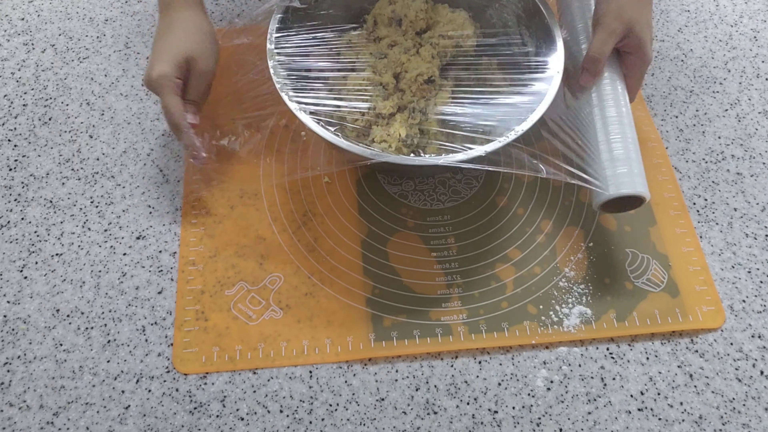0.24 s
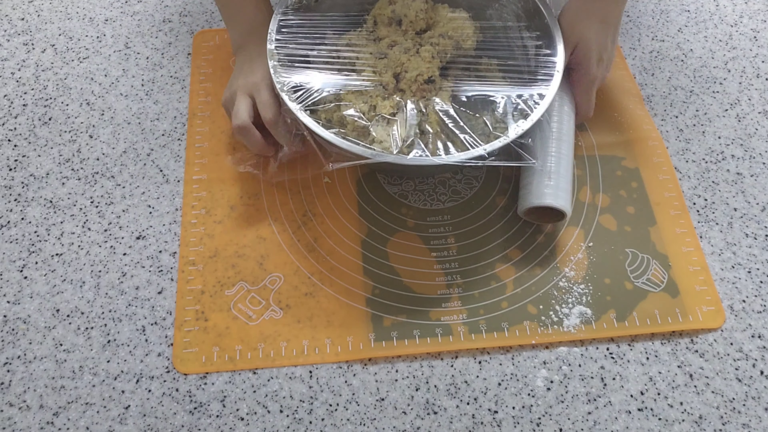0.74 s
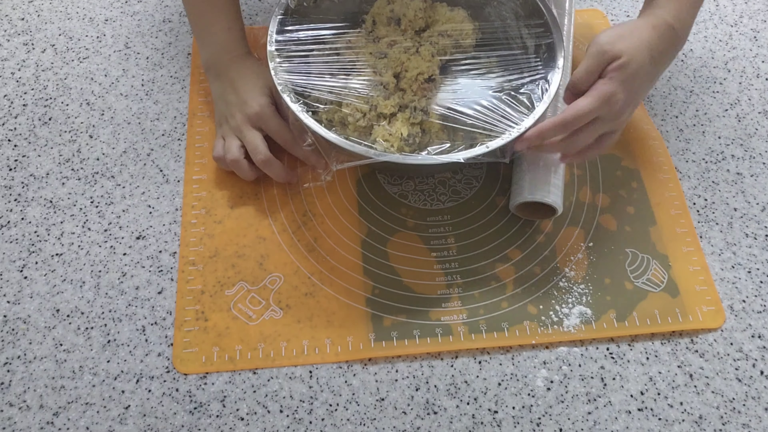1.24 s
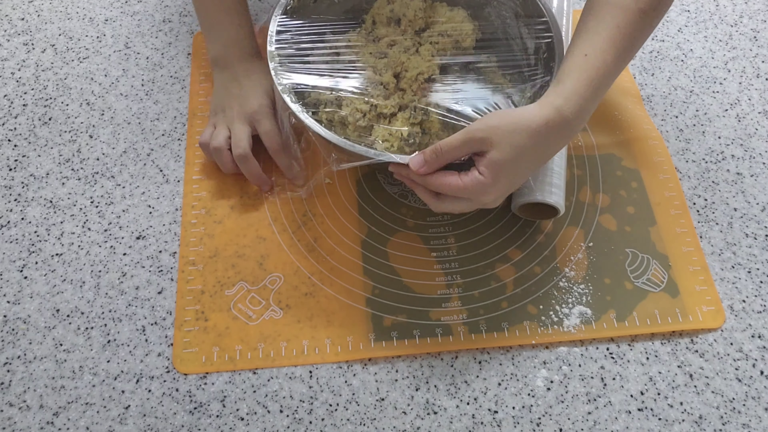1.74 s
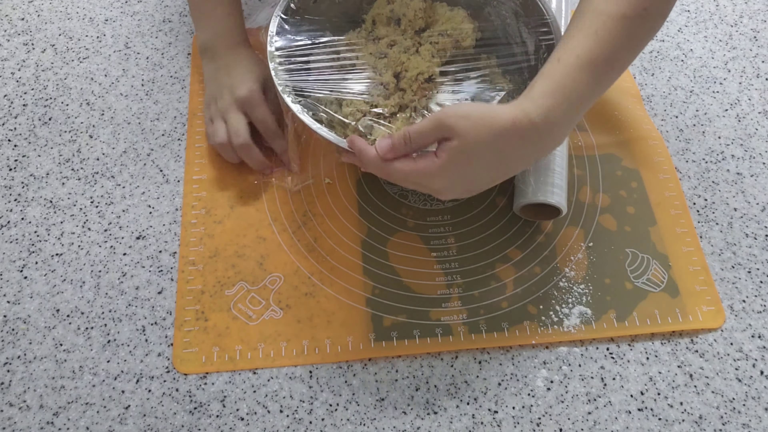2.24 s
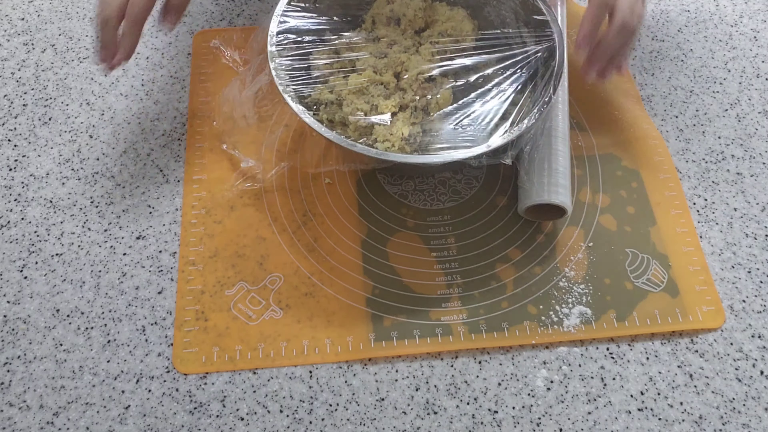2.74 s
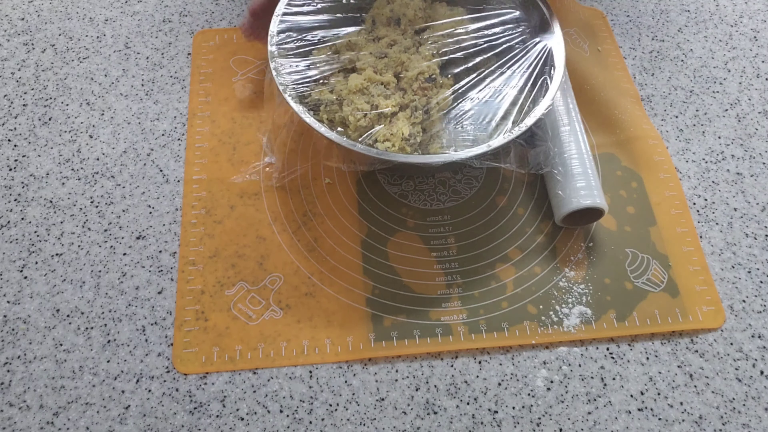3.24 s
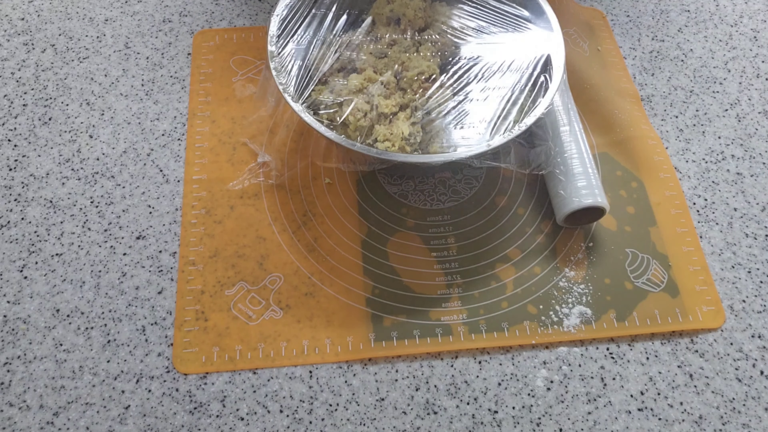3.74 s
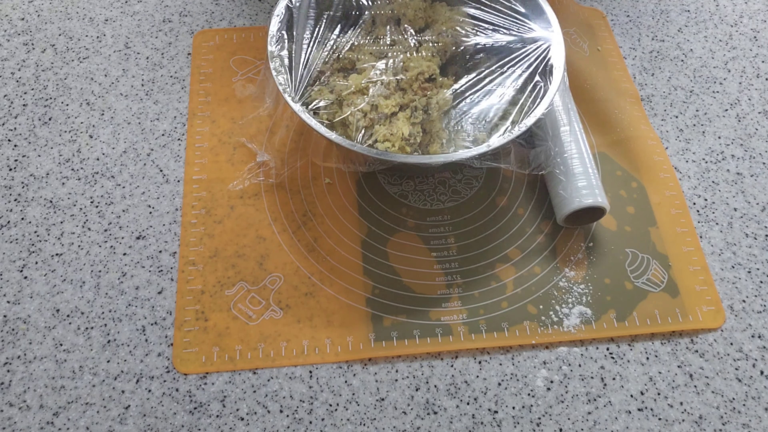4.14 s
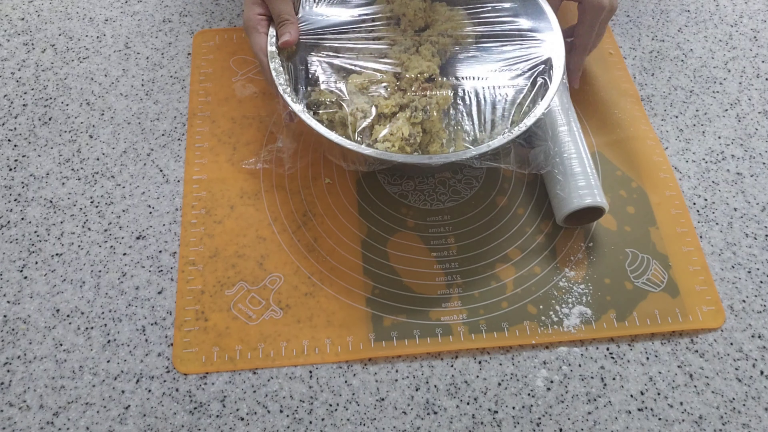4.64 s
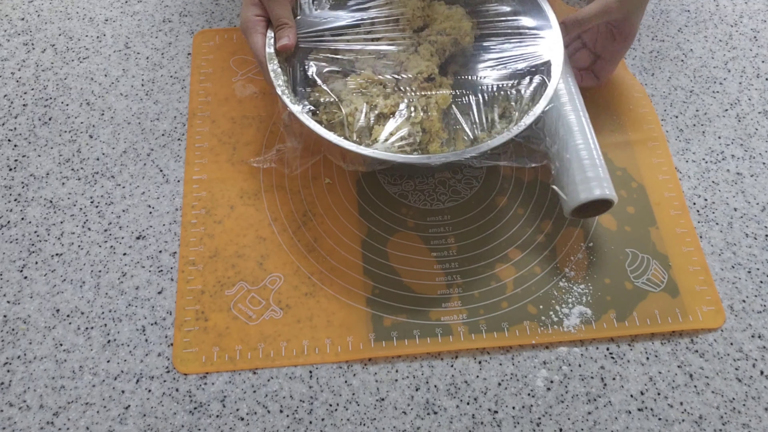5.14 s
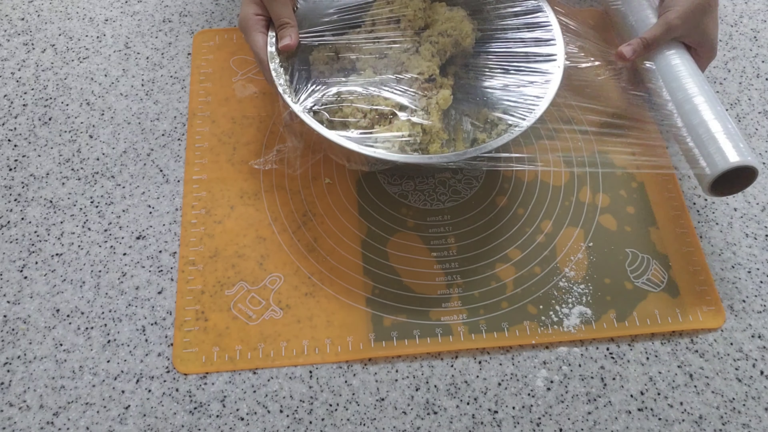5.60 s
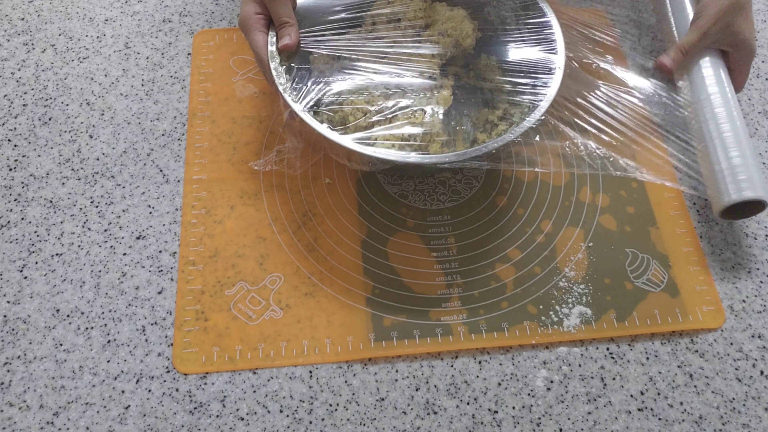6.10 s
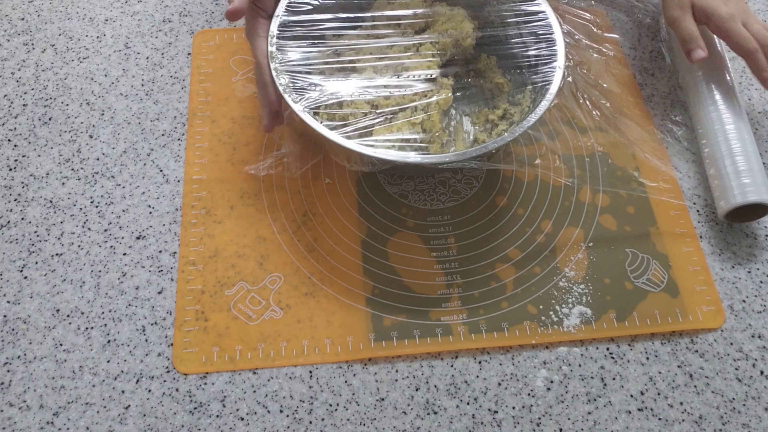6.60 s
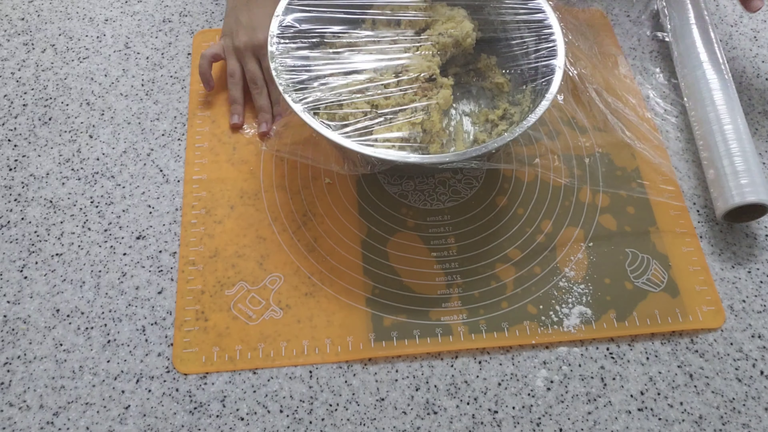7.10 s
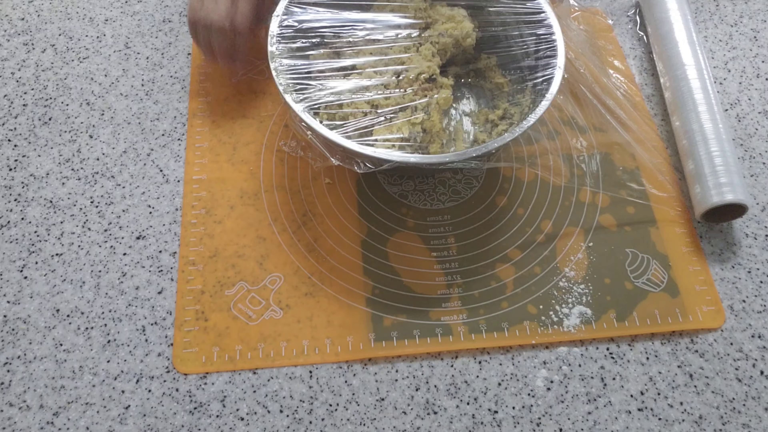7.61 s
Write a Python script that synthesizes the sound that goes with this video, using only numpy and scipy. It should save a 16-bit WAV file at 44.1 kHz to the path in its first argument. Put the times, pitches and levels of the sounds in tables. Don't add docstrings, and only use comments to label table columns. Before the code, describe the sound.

A quiet kitchen with a low, soft rumble and a distant murmur that recedes at the start. Very high, thin squeals of taut film sound in the first 0.25 s. From 0.3 s film rustles lightly, then crackles densely around 1.0-1.5 s with sharp snaps and dull worktop bumps. Smaller crinkles come at 1.9-2.6 s, with another thin squeal near 2.1 s. After a lull, a crisp burst at 3.0-3.3 s has a hard snap at 3.1 s; sparse ticks and a short crackle near 4.1 s follow. At 4.8 s a knock and click, then crackling from 5.15 s builds to the loudest, ripping, buzzing jerk at 5.6 s. Weaker zipping pulls run 6.0-6.35 s, the roll thumps down at 6.44 s, a fluttering fingertip squeak comes at 6.85 s, and faint smoothing rustles fade to the end at about 7.9 s.

```python
import sys
import numpy as np
from scipy import signal
from scipy.fft import rfft, irfft, next_fast_len
from scipy.io import wavfile
from scipy.ndimage import uniform_filter1d

SR = 44100
rng = np.random.default_rng(int(sys.argv[2]) if len(sys.argv) > 2 else 0)


def amplitude_ratio(level_db):
    exponent = np.asarray(level_db, float) / 20
    return 10 ** exponent


def persist_wave(psi):
    counts = np.round(np.clip(psi, -1, 1) * 32767).astype(np.int16)
    wavfile.write(sys.argv[1], SR, np.atleast_2d(counts).T)


N = 346533
TIME = np.arange(N) / SR


def rms_one(x):
    return x / np.sqrt(np.mean(x ** 2) + 1e-20)


def in_time(rows):
    s, *columns = np.transpose(rows)
    return [np.interp(TIME, s, c) for c in columns]


def bursts(tables, fade_s):
    gate = 0
    for table in tables:
        start, end = table[0][0], table[-1][0]
        gate = gate + np.interp(TIME, [start, start + fade_s, end - fade_s, end], [0, 1, 1, 0])
    return gate, *in_time([row for table in tables for row in table])


def at_hz(points, hz):
    points_hz, values = np.array(points).T
    return np.interp(np.log(hz), np.log(points_hz), values)


def band(x, low_hz, high_hz):
    edges_hz = [low_hz, min(high_hz, .45 * SR)]
    return signal.sosfilt(signal.butter(2, edges_hz, "band", fs=SR, output="sos"), x)


def drift(rate):
    r = np.exp(-80 * np.pi * rate / SR)
    steps = rng.standard_normal(N // 40 + 2002)
    slow = signal.lfilter([1], [1, -2 * r, r * r], steps)[2000:]
    return np.interp(np.arange(N) / 40, np.arange(len(slow)), rms_one(slow))


def resonance(x, hz, width_hz):
    r = np.exp(-np.pi * width_hz / SR)
    zeros = np.array([1, 0, -1]) * (1 - r * r) / 2
    return signal.lfilter(zeros, [1, -2 * r * np.cos(2 * np.pi * hz / SR), r * r], x)


# (frequency [Hz], correlation [0-1])
LIKENESS = [(30, 0.33), (150, 1), (400, 0.52), (1000, 0.028), (3000, 0.013), (16000, 0.0097)]


def spread(sources, edges, gain):
    out = 0
    for k, (low, high) in enumerate(zip(edges, edges[1:])):
        mid, side = band(sources[k % 2], low, high)
        hz = np.sqrt(low * high)
        alike = np.clip(at_hz(LIKENESS, hz), 0, 1)
        out = out + gain(hz) * (np.sqrt(1 + alike) * mid + np.sqrt(1 - alike) * side * [[1], [-1]])
    return out


# (frequency [Hz], density [dB per Hz])
FLOOR = [(35, -21), (60, 3), (85, -3), (156, -4.5), (262, -10), (371, -6), (621, -16), (2140, -36.5),
         (3420, -51), (6430, -39), (10500, -37), (14200, -66), (16000, -38)]
# (time [s], level [dB])
RUMBLE = [(0.0, -55), (0.7, -47.5), (0.74, -37.5), (0.9, -55.5), (1.03, -44), (1.3, -48), (1.46, -46.5),
          (1.51, -69), (1.6, -50), (3.52, -57.5), (3.57, -80), (3.63, -44.5), (3.74, -54.5), (4.79, -54.5),
          (4.86, -48), (5.14, -59), (5.16, -54), (7.84, -54.5), (7.86, -62)]
# (frequency [Hz], width [Hz], level [dB])
APPLIANCE = [(78.03, 5.9, -57), (365, 42, -64), (7050, 200, -83)]


def room_tone():
    white = rng.standard_normal((2, 2, N))
    backward = white[..., ::-1]
    edges = 20 * 2 ** np.arange(0, 10, .5)
    floor = amplitude_ratio(-57) * rms_one(spread(white, edges, lambda hz: amplitude_ratio(at_hz(FLOOR, hz))))
    hums = 0
    for hz, width_hz, db in APPLIANCE:
        hum = resonance(resonance(backward[0, 0], hz, width_hz), hz, width_hz)
        hums = hums + amplitude_ratio(db) * rms_one(hum)
    rumble_db = in_time(RUMBLE)[0] - 1.0 + 2.1 * drift(4.1)
    rumble = amplitude_ratio(rumble_db) * rms_one(band(band(backward[1, 0], 35.0, 80.3), 50.0, 122.0))
    murmur_gain = amplitude_ratio(-54.5 - 6 * TIME) + amplitude_ratio(-67)
    murmur = murmur_gain * rms_one(band(backward[0, 1] + 0.79 * backward[1], 82, 527))
    gusts = amplitude_ratio(-65 + 5.5 * drift(6)) * rms_one(band(backward[1, 1], 20, 52))
    return floor + murmur + (hums + rumble + gusts) * amplitude_ratio([[-.6], [.6]])


# (time [s], frequency [Hz], level [dB])
SQUEALS = [
    [(0, 14300, -78), (.035, 13900, -78)],
    [(.07, 13900, -85), (.105, 13950, -73), (.13, 14000, -81), (.155, 14200, -62), (.18, 14200, -69),
     (.24, 14500, -74)],
    [(2.09, 13400, -76), (2.125, 13900, -67), (2.16, 13950, -65), (2.2, 14050, -67), (2.24, 13800, -67)],
]


def squeals():
    gate, hz, db = bursts(SQUEALS, .02)
    turns = np.cumsum(hz * (1 + 0.0066 * drift(80))) / SR
    return gate * amplitude_ratio(db + 7 + 2.3 * drift(30)) * np.sin(2 * np.pi * turns)


# (peak time [s], rustle level [dB], rise [s], fall [s])
LAYING = [(.311, -51, 0.27, 0.2), (0.483, -44, 0.1, 0.12), (0.68, -43, 0.042, 0.059),
          (.756, -48.5, 0.042, 0.26), (1.0, -47.5, 0.27, 0.33), (1.29, -50, .3, .15),
          (1.132, -40.5, 0.0032, .05), (1.112, -48, .003, .02), (.996, -48.5, .004, 0.046),
          (1.085, -47, .04, .03), (1.167, -35.5, 0.029, 0.029), (1.197, -36, 0.006, 0.045),
          (1.22, -43.5, .015, 0.14), (1.37, -40, 0.079, 0.096), (1.385, -42, .02, 0.075),
          (1.425, -40.5, 0.08, 0.022), (1.456, -36.5, 0.013, 0.014), (1.59, -46.5, 0.044, 0.067),
          (1.68, -54, 0.21, 0.71), (1.905, -44.5, 0.03, 0.065), (1.94, -60, .03, 0.085),
          (2.031, -44, 0.067, 0.016), (2.19, -53, 0.17, .1), (2.245, -45, 0.05, 0.11),
          (2.339, -43, 0.067, 0.052), (2.515, -48, 0.023, 0.089), (2.555, -46, 0.11, 0.099),
          (2.65, -54, 0.083, 0.18)]
# (peak time [s], rustle level [dB], rise [s], fall [s])
TUCKING = [(3.005, -48, 0.012, 0.29), (3.051, -39, 0.017, 0.084), (3.119, -38.5, 0.011, 0.058),
           (3.177, -42, 0.13, 0.1), (3.262, -38.5, 0.009, 0.063), (3.285, -38, 0.035, 0.072),
           (3.36, -62.5, .05, 0.43), (3.606, -56.5, 0.031, 0.68), (3.716, -49, 0.12, 0.031),
           (3.758, -42, 0.011, 0.018), (3.8, -53.5, 0.027, 0.11), (4.033, -53, 0.079, 0.076),
           (4.134, -40.5, 0.077, 0.048), (4.22, -66.5, .05, .2), (4.516, -55.5, 0.0096, 0.33),
           (4.65, -53, .02, 0.08), (4.581, -50.5, 0.074, 0.041), (4.715, -56, 0.1, 0.027)]
# (peak time [s], rustle level [dB], rise [s], fall [s])
UNROLLING = [(4.839, -45.5, 0.0088, 0.052), (5.02, -70, 0.02, 0.12), (5.148, -48, 0.046, 0.05),
             (5.582, -34, 0.012, .03), (5.67, -49, .02, 0.051), (5.273, -47, 0.0036, 0.2),
             (5.321, -37.5, 0.03, 0.043), (5.341, -35, 0.014, 0.025), (5.41, -43, 0.0054, 0.32),
             (5.459, -35.5, 0.058, 0.023), (5.543, -41, 0.32, 0.05), (5.597, -21.5, 0.017, 0.036),
             (5.613, -22, 0.024, 0.031), (5.641, -28, 0.036, 0.04), (5.775, -55.5, 0.021, 0.062),
             (5.852, -47.5, 0.011, 0.028), (5.921, -49, 0.022, 0.096), (6.032, -48, .01, .08),
             (6.052, -35.5, 0.019, 0.069), (6.102, -37.5, 0.077, 0.021), (6.226, -40, 0.05, 0.035),
             (6.29, -38, 0.026, 0.048), (6.311, -35.5, 0.017, 0.045), (6.348, -45, 0.0076, 0.18)]
# (peak time [s], rustle level [dB], rise [s], fall [s])
SMOOTHING = [(6.5, -53, 0.061, 0.24), (6.585, -41, 0.034, 0.048), (6.775, -44, 0.056, 0.66),
             (6.974, -54, 0.01, 0.054), (7.2, -45.5, 0.18, 0.07), (7.504, -50.5, 0.82, 0.036),
             (7.61, -53, 0.1, 0.064), (7.768, -58, 0.34, 0.11)]
# (peak time [s], rustle level [dB], rise [s], fall [s])
RUBBING = [(6.032, -37.5, 0.015, 0.057), (5.605, -25, 0.026, .04), (6.86, -34, 0.037, 0.044),
           (5.8, -42, 0.013, 0.046)]


def handling():
    stages = [(LAYING, -8), (TUCKING, -8.5), (UNROLLING, -6.5), (SMOOTHING, -10), (RUBBING, -16.5)]
    coarse = TIME[::32]
    power = amplitude_ratio(2 * -88)
    low = power * -18.5
    for moves, low_db in stages:
        for s, db, rise, fall in moves:
            late = coarse - s
            move = amplitude_ratio(2 * (db - 15 * np.where(late < 0, -late / rise, late / fall)))
            move_low_db = low_db + 0.0091 * (db + 37.0) + 1.5 * (late > 0)
            power = power + move
            low = low + move * move_low_db
    return [np.interp(TIME, coarse, v) for v in (10 * np.log10(power), low / power)]


# (frequency [Hz], density [dB per Hz])
RUSTLE_COLOUR = [(290, -19.5), (500, -8), (728, -14.5), (986, -5.5), (1220, -16), (1480, -11.5),
                 (1890, -12.5), (2630, -8.5), (3270, -10.5), (6090, -5.5), (10500, -9), (14300, -3),
                 (15800, -12)]


def rustle(slips_per_s, uneven_db, clumps_db, patchy_db):
    bright_db, low_db = handling()
    happens = rng.random(N) < slips_per_s / SR
    sizes = amplitude_ratio(uneven_db * np.minimum(rng.exponential(1, N), 4)) * happens
    slips = uniform_filter1d(sizes, size=6) * amplitude_ratio(clumps_db * drift(32.0)) * rng.standard_normal((2, 2, N))

    def gain(hz):
        low_share = np.clip(np.log(4500 / hz) / np.log(2.5), 0, 1)
        db = at_hz(RUSTLE_COLOUR, hz) + low_share * (low_db + 12.0)
        if 2000 < hz < 4100 or 8200 < hz < 11600:
            db = db + 0.18 * (bright_db + 31.5)
        return amplitude_ratio(db + patchy_db * drift(20.4))

    edges = 330 * 2 ** np.arange(0, 6, .4)
    return amplitude_ratio(bright_db + 4.0) * spread(rms_one(slips) + 1e-18, edges, gain)


def ticks(per_s, uneven_db, length_s):
    born = (rng.random(N) < per_s / SR) * amplitude_ratio(uneven_db * np.minimum(rng.exponential(1, N), 3))
    dealt, noise = rng.integers(0, 7, N), rng.standard_normal((2, N))
    pops = 0
    for k, hz in enumerate(np.geomspace(1800, 11000, 7)):
        clicks = born * (dealt == k) + 1e-18
        dying = signal.lfilter([1], [1, -np.exp(-1 / (length_s * SR))], clicks)
        pops = pops + band(noise * dying, hz / 1.3, hz * 1.7)
    return amplitude_ratio(handling()[0]) * rms_one(pops)


# (time [s], peak level [dB], ring frequency [Hz], relative low part [dB])
SNAPS = [(0.3083, -29.5, 5730, -2.5), (.6684, -32, 13400, -37), (0.752, -31, 6300, -32),
         (0.7775, -29, 1440, -8.5), (0.991, -33, 9150, -22), (1.0228, -26.5, 3870, -11),
         (1.1116, -34, 6650, -12), (1.1287, -25, 13100, -18), (1.195, -24, 6140, -12),
         (1.3273, -34, 6200, -20), (1.4537, -30, 6400, -5.5), (2.0285, -25.5, 1760, -30),
         (2.7351, -34.5, 6300, -14), (3.049, -24.5, 4700, -41), (3.1188, -16.5, 5900, -41),
         (3.2635, -24, 11700, -34), (3.758, -33, 6340, -35), (4.0296, -34.5, 6170, -9),
         (4.097, -40, 1600, 2.5), (4.8347, -28, 5900, -3), (5.151, -29.5, 8100, -32),
         (5.2716, -35, 8160, -15), (5.2989, -30, 1633, -9), (5.339, -26.5, 1670, -1.5),
         (5.409, -31, 12700, -19), (5.4577, -20, 3220, -10), (5.7724, -32.5, 5900, -11.5),
         (6.2843, -28, 13030, -13), (6.578, -31, 6130, -30), (6.9683, -35.5, 1530, -10)]
# (time [s], peak level [dB], ring frequency [Hz])
FURTHER_SNAPS = [(.367, -53, 13000), (0.4298, -40, 6620), (1.16, -23, 8900), (1.17, -29, 4500),
                 (1.218, -31, 3500), (1.3666, -29, 7000), (1.719, -40, 11800), (2.1176, -40, 13700),
                 (3.6047, -39, 14100), (3.9409, -52, 13900), (4.137, -29.5, 4100), (4.786, -49, 7000),
                 (5.012, -53, 8980), (5.037, -47, 1650), (5.1023, -49, 8950), (5.1238, -39, 12900),
                 (5.316, -32, 2600), (5.4291, -25, 12400), (5.5947, -25, 14000), (5.7603, -49, 13500),
                 (6.022, -46, 13500), (6.0274, -29, 14090), (6.346, -28, 2500), (6.711, -48, 6300),
                 (7.4895, -54, 13500), (7.7183, -44, 5200), (0.614, -37, 9250), (0.836, -45, 11800),
                 (0.9035, -36.5, 6530), (1.521, -38, 9150), (1.5585, -45, 4730), (1.8223, -52, 5840),
                 (1.9016, -45, 6400), (2.4334, -37.5, 7050), (3.008, -43, 7260), (3.495, -44.5, 6800),
                 (3.583, -41.5, 6800), (3.8856, -47.5, 11800), (2.034, -30, 6000), (2.27, -37, 1500),
                 (2.336, -32.5, 4500), (3.763, -41, 13500), (5.861, -43, 9000), (5.85, -38, 3500),
                 (1.59, -32, 13000), (1.91, -36, 14000), (2.24, -39, 6500), (4.109, -31.5, 5000),
                 (3.9764, -40, 6000), (4.5121, -50, 9270), (4.6457, -38, 6610), (5.636, -13.5, 7760),
                 (5.838, -38, 13200), (5.914, -37, 12000), (6.4365, -37, 2210), (6.7212, -39, 6900),
                 (7.0519, -46, 11900), (7.7688, -37, 6840)]


def snaps():
    out, t = np.zeros((2, N + 4000)), np.arange(4000) / SR
    for s, db, hz, low_db in SNAPS + [(*row, -13.5) for row in FURTHER_SNAPS]:
        spray_db = -38.5 + 0.73 * (db + 31.5) - db
        noise, at = rng.standard_normal((2, 4000)), round(s * SR)
        crack = noise * (amplitude_ratio(-60 * t / 0.015) + amplitude_ratio(spray_db - 60 * t / 0.14))
        crack[:, 0] += 7.0
        bright = band(crack, 1500, 17000) + resonance(crack, hz, .25 * hz) * amplitude_ratio(9)
        push = band(crack[0] + 0.29 * crack, 246, 1440)
        snap = bright / abs(bright).max() + amplitude_ratio(low_db) * push / abs(push).max()
        out[:, at:at + 4000] += amplitude_ratio(db) * snap
    return out[:, :N]


# (frequency [Hz], level [dB], t60 [s])
BODY = [(135, -1.5, 0.057), (219.5, -2.5, 0.15), (267, -6.5, 0.091), (366, -5.5, 0.13), (517, -5, 0.12),
        (626, -6, 0.063), (735, -10, 0.017), (1020, -29, 0.019)]
# (time [s], level [dB], hardness [dB per octave], boom level [dB], ring length [share])
KNOCKS = [(0.494, -47.5, 1.5, -37, 0.77), (1.166, -39.5, 2, -48, 0.61), (1.208, -48, -11, -39, 2.4),
          (1.252, -40.5, -5, -36, 0.7), (2.534, -44.5, -5, -46, 1), (3.1177, -41.5, 16, -41, 0.33),
          (4.8348, -41.5, -8, -39, 1.3), (4.871, -53, -5, -39, 0.92), (4.905, -55, -9, -41, 0.96),
          (4.933, -54, -9, -44, 0.31), (.735, -55, -9, -38, 2.1), (1.675, -51, -6.5, -40, 1.4),
          (2.26, -54, -4.5, -41, 2), (3.239, -56, -13, -47, 0.91), (5.299, -46.5, -11, -39, 0.35),
          (5.47, -54, -2, -46, 0.84), (5.15, -36.5, -1, -57, 0.46), (5.338, -40.5, 12, -55, 0.36),
          (5.458, -43, 15, -39, 0.45), (5.663, -41, 1, -35, 1.04), (6.345, -37.5, -5.5, -55, 1.2),
          (6.419, -40.5, -6.5, -56, 1), (6.437, -26.5, -4, -43, 0.62)]


def knocks():
    out, t = np.zeros(N + 9000), np.arange(9000) / SR
    for s, db, hardness_db, boom_db, ring_share in KNOCKS:
        luck = rng.standard_normal((len(BODY), 2))
        ring = 0
        for k, ((hz, mode_db, t60), (level_luck, pitch_luck)) in enumerate(zip(BODY, luck)):
            start_db = db + mode_db + hardness_db * np.log2(hz / 300) + level_luck
            tone = np.sin(2 * np.pi * hz * (1 + pitch_luck / 40) * t) * (-1) ** k
            ring = ring + amplitude_ratio(start_db - 60 * t / (t60 * ring_share)) * tone
        boom = amplitude_ratio(boom_db - 60 * t / 0.13) * np.sin(2 * np.pi * 82 * t)
        top_hz = np.clip(700 + 60 * hardness_db, 320, 1200)
        rattle = rms_one(band(rng.standard_normal(9000), 157, top_hz))
        rattle = rattle * amplitude_ratio(db - 2.5 - 60 * t / (0.21 * ring_share))
        out[round(s * SR):][:9000] += ring + boom + rattle
    return out[:N]


# (time [s], level
# [dB], centre frequency [Hz])
RUBS = [
    [(1.205, -50, 5770), (1.22, -35, 5970), (1.238, -52, 5870)],
    [(1.249, -39, 6100), (1.262, -43, 6250), (1.285, -56, 6300)],
    [(1.56, -52, 4700), (1.58, -58, 4700)],
    [(1.67, -43, 6000), (1.7, -64, 5610)],
    [(1.822, -51, 5600), (1.85, -56, 5896)],
    [(1.935, -48, 5825), (1.945, -46, 5890), (1.97, -57, 5940)],
    [(3.165, -44, 8150), (3.176, -33, 8135), (3.187, -41, 8160)],
    [(4.028, -33, 6390), (4.038, -49, 6300), (4.07, -52, 6100)],
    [(4.484, -48.5, 1307), (4.498, -59, 1300)],
    [(4.578, -40.5, 1250), (4.592, -49, 1256)],
    [(4.834, -35, 5970), (4.854, -50, 5960), (4.92, -64, 6070)],
    [(6.81, -46, 4700), (6.816, -46, 4440), (6.82, -54, 4440)],
    [(6.848, -44, 5900), (6.853, -31, 6300), (6.875, -44, 6600)],
]
# (time [s], level [dB], centre frequency [Hz])
SQUEAK = [
    [(6.832, -46, 5530), (6.843, -28, 5390), (6.847, -32, 5250), (6.852, -24, 5430), (6.856, -33, 5070),
     (6.863, -28.5, 4900), (6.868, -30, 4980), (6.874, -39, 4970), (6.905, -48, 5120)],
]


def rubs(tables, width_hz, second_db, third_db):
    gate, db, hz = bursts(tables, 0.001)
    cosine, sine = [band(band(rng.standard_normal((2, N)), 10, width_hz), 10, width_hz) for _ in range(2)]
    turn = 2 * np.pi * np.cumsum(hz) / SR
    tone = cosine * np.cos(turn) + sine * np.sin(turn)
    overtones = amplitude_ratio(second_db) * cosine * np.sin(2 * turn) + amplitude_ratio(third_db) * sine * np.sin(3 * turn)
    return gate * amplitude_ratio(db - 5.0) * rms_one(tone + overtones)


# (time [s], peak level [dB], frequency [Hz], t60 [s])
PINGS = [(1.4536, -37, 6450, .02), (1.675, -43.5, 6100, 0.026), (1.824, -51, 5780, .03),
         (1.941, -39.5, 5890, 0.025), (2.0285, -45, 1810, .04), (2.51, -50.5, 1450, 0.055),
         (4.8349, -33.5, 5560, .02), (4.8362, -33, 6500, 0.019), (5.1512, -39, 8140, 0.01),
         (5.636, -24, 7800, 0.014), (6.2835, -28, 14500, .015)]


def pings():
    out, t = np.zeros(N + 4000), np.arange(4000) / SR
    for s, db, hz, t60 in PINGS:
        out[round(s * SR):][:4000] += amplitude_ratio(db - 60 * t / t60) * np.sin(2 * np.pi * hz * t)
    return out[:N]


# (time [s], slip rate [per s], buzz level [dB], relative overtone level [dB])
PEEL = [
    [(3.13, 1400, -49, -25), (3.14, 1460, -45, -25), (3.153, 1500, -61, -25)],
    [(5.571, 1070, -40, -15), (5.578, 1300, -26.5, -17), (5.581, 1230, -34, -8), (5.584, 1110, -27, -10),
     (5.59, 1150, -44, -13)],
    [(5.591, 1210, -40, -15), (5.596, 1270, -23, -12), (5.603, 1050, -35, -11), (5.612, 1060, -21, -19),
     (5.619, 870, -28.5, 1), (5.625, 750, -35.5, 3), (5.634, 830, -30, -3), (5.642, 870, -35, 1),
     (5.647, 725, -43, 10)],
    [(5.648, 966, -31, -12), (5.654, 517, -38, -9), (5.661, 220, -28, -22)],
    [(6.03, 720, -54, -10), (6.043, 790, -55, 4), (6.05, 720, -29, -1.5), (6.056, 690, -46, 9),
     (6.062, 690, -41, -2), (6.068, 560, -45, 0), (6.074, 570, -39, 0)],
    [(6.082, 910, -42, -14), (6.088, 940, -40, -7), (6.095, 880, -38, -7), (6.101, 880, -51, 7),
     (6.109, 810, -38.5, -6), (6.114, 790, -56, -9), (6.124, 880, -46, -17)],
    [(6.208, 600, -44, -20), (6.222, 565, -55, -20), (6.231, 500, -36.5, -15), (6.239, 580, -52, -20)],
    [(6.285, 860, -50, -15), (6.293, 710, -44, -17), (6.302, 860, -43, -10)],
    [(6.306, 770, -43, -16), (6.313, 710, -40.5, -3), (6.322, 490, -38.5, -20), (6.333, 310, -51, -12)],
]


def peel(jitter, lead):
    gate, hz, db, overtone_db = bursts(PEEL, .001)
    waver = 1 + jitter * drift(180)
    uneven = amplitude_ratio(1.5 * np.array([drift(190), drift(180)]))
    turns = 2 * np.pi * np.cumsum(hz * waver) / SR + np.array([[lead], [0]])
    overtones = np.cos(2 * turns) + amplitude_ratio(-11.5) * np.cos(3 * turns)
    return gate * amplitude_ratio(db + 2.0) * uneven * (np.cos(turns) + amplitude_ratio(overtone_db) * overtones)


def kitchen(x):
    t60_s, wall_cut_hz = 0.12, 6000
    size = next_fast_len(N + SR)
    hz, spectrum, out = np.arange(size // 2 + 1) * SR / size, rfft(x, size), []
    for lags in rng.uniform(.004, 0.027, (2, 8)):
        answer = 0
        for d in lags:
            loop = amplitude_ratio(-60 * d / t60_s) * np.exp(-2j * np.pi * hz * d) / (1 + 1j * hz / wall_cut_hz)
            answer = answer + loop / (1 - loop)
        out.append(irfft(spectrum * answer, size)[:N])
    return np.array(out)


# (time [s], left-right level difference [dB])
HANDS = [(0, 2.5), (2.5, 3), (5, 2), (6.39, 0.5), (6.85, 3.5), (7.3, 3.5), (7.86, 2.5)]


def scene():
    crinkle = rustle(slips_per_s=14000, uneven_db=2.0, clumps_db=1.1, patchy_db=2.0)
    crinkle = crinkle + amplitude_ratio(-15) * ticks(per_s=220, uneven_db=3.5, length_s=.0015)
    fingers = rubs(RUBS, width_hz=450, second_db=-17.0, third_db=-30.0)
    fingers = fingers + rubs(SQUEAK, width_hz=370, second_db=-2.0, third_db=-5.0)
    pan = amplitude_ratio(in_time(HANDS)[0] * [[.5], [-.5]])
    film = (crinkle + snaps() + pings() + fingers + squeals()) * pan
    close = film + peel(jitter=0.03033, lead=0.57) + knocks()
    return close + amplitude_ratio(-13.5) * kitchen(close.mean(axis=0)) + room_tone()


def low_pass(x):
    return signal.sosfilt(signal.butter(12, 16810, fs=SR, output="sos"), x)


def record(dry):
    rounded = .3 * np.tanh(dry / .3)
    mix = signal.sosfilt(signal.ellip(12, .5, 70, 15950, fs=SR, output="sos"), rounded)
    return low_pass(mix)


dry = scene()
out = record(dry)
persist_wave(out)
```